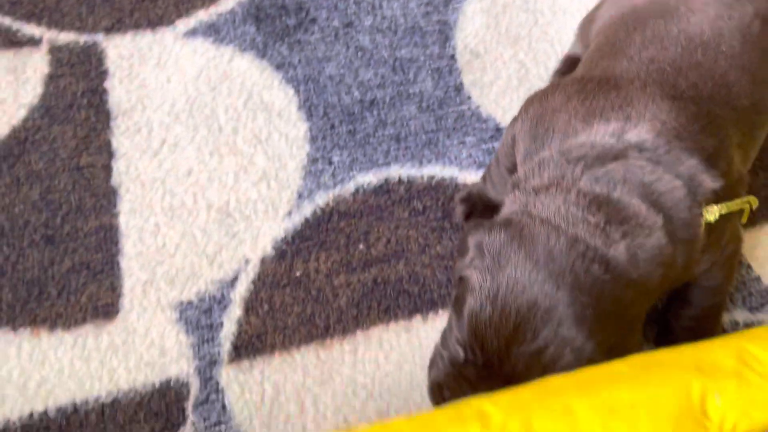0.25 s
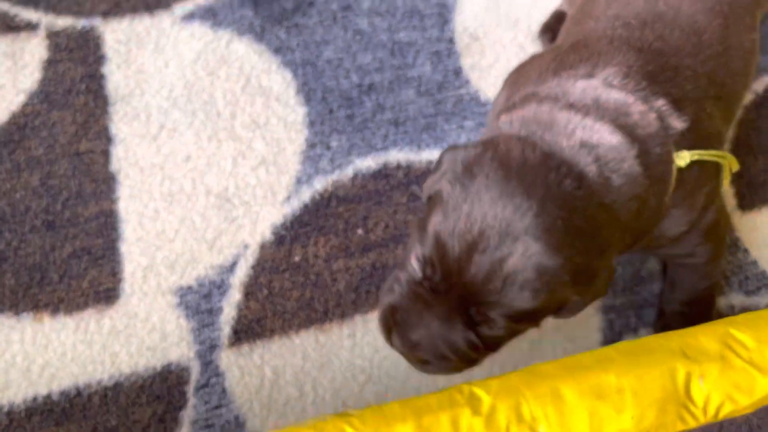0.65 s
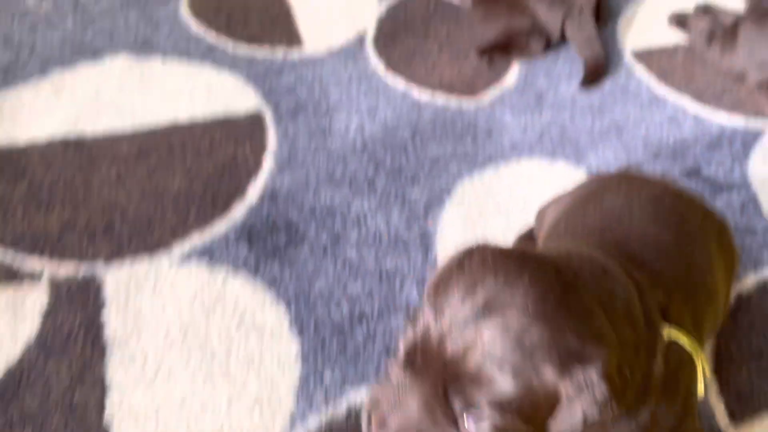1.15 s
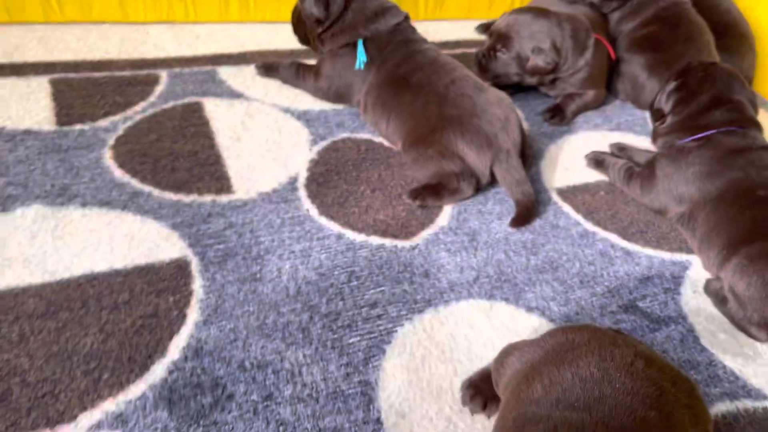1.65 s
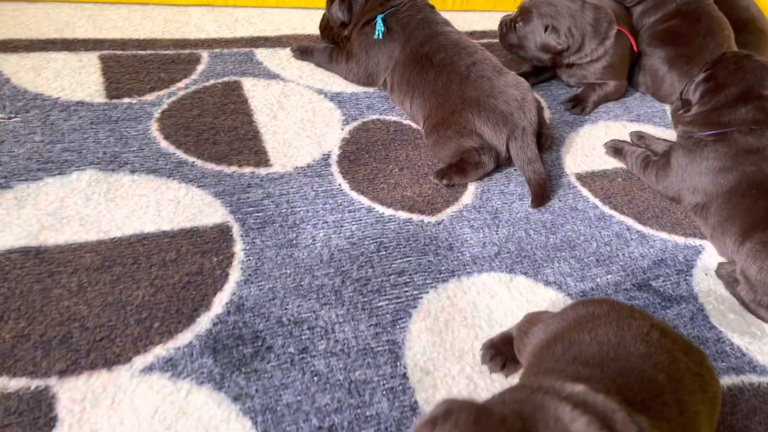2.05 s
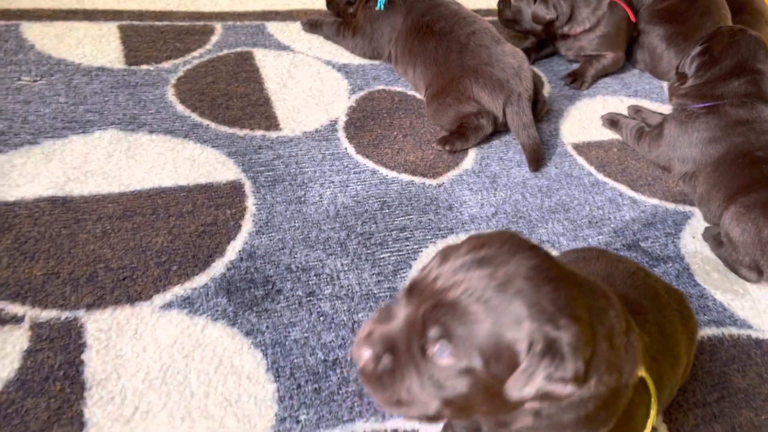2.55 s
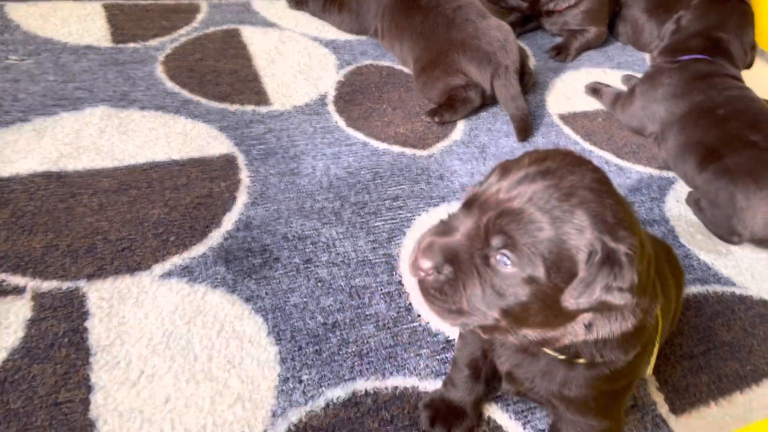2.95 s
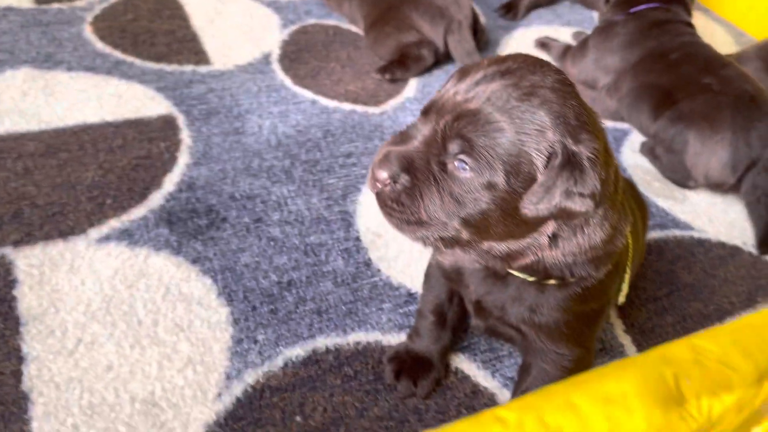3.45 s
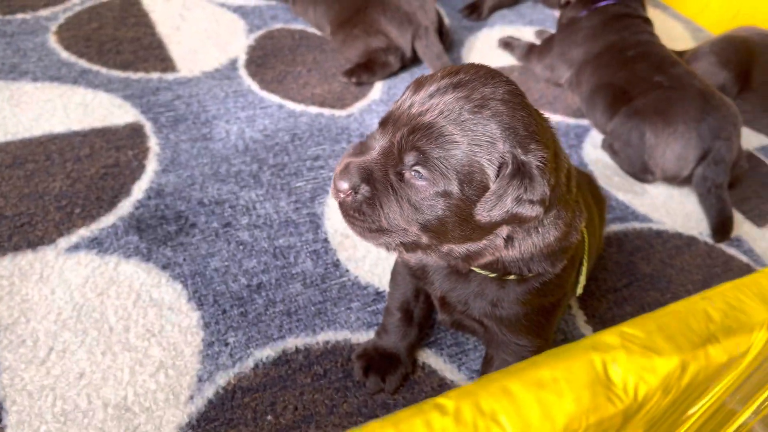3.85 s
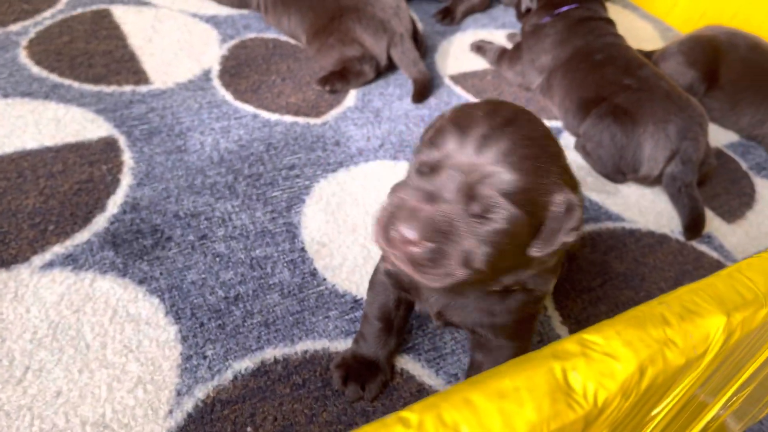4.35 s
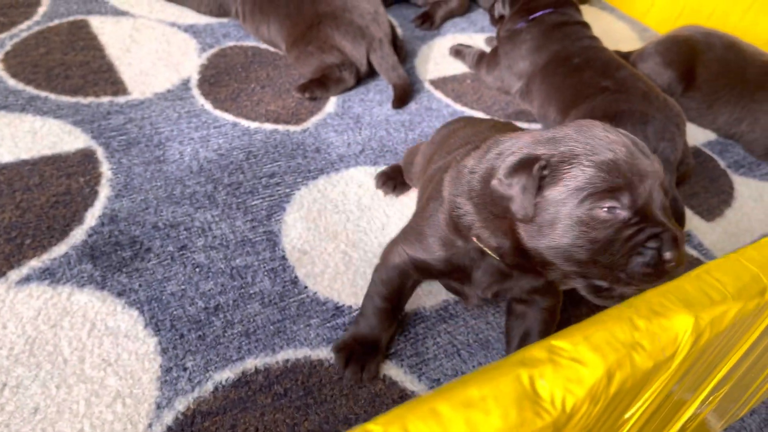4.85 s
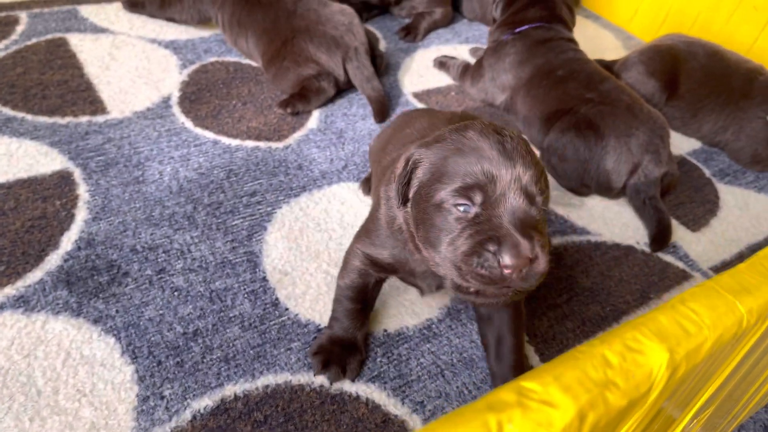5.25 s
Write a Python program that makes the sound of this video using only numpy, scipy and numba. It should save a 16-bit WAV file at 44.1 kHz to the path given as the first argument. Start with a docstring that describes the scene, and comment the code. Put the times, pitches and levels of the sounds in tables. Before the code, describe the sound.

Several very young puppies heard close by in a small soft room. Squeaks and muffled moans start at once with soft floor knocks, then a trembling whine slides down. Small grunts and carpet rustles lead into hoarse, creaky rasps. A sharp squeak and wavering whines follow, and the loudest piping yelps come near the end. Hand-held phone, faint room hush and low handling rumble.

```python
"""Puppies on a carpet indoors, heard by a hand-held phone close above: over shaped-noise hush and low
rumble, harmonic stacks squeak and moan at once, noise knocks the floor, trembling whines join at 0.2 s.
From 1.2 s short sliding grunts and noise brushes; from 1.9 s hoarse rasps: uneven slaps ring a throat.
Cries recur to the end, a yelp cluster at 4.5 s. Delay lines add a small soft room; two ports pick it up."""
import sys
import numpy as np
from scipy import signal
from scipy.fft import rfft, irfft, next_fast_len
from scipy.io import wavfile
from scipy.ndimage import uniform_filter1d
from numba import njit

SR = 44100
rng = np.random.default_rng(int(sys.argv[2]) if len(sys.argv) > 2 else 0)


def generate_wav(sig):
    """Save sig (samples, or channels by samples) to the path in sys.argv[1] as 16-bit PCM at SR."""
    pcm = np.round(np.clip(np.atleast_2d(sig).T, -1, 1) * 32767).astype(np.int16)
    wavfile.write(sys.argv[1], SR, pcm)


N = 242991

# colour of the room's quiet: f/Hz, relative density/dB
HUSH_COLOUR = [(53, -30), (90, -5), (341, -14.5), (987, -25), (2430, -37), (8830, -38.5), (10200, -52),
               (11100, -44.5), (12000, -45), (15600, -67.5), (22000, -120)]
HUSH_DB = -72.5
# low tremor of the hand that holds the phone: t/s, level/dB
RUMBLE_LEVEL = [(0.0, -77), (0.6, -80.5), (1.27, -70), (1.33, -81.5), (2.03, -63), (2.07, -77.5),
                (2.44, -59), (3.54, -66), (3.78, -85), (3.85, -65.5), (5.39, -83.5), (5.51, -65)]

# open-mouth gain: f/Hz, gain/dB
MOUTH_GAIN = [(2500, -9.5), (3100, -20.5), (4000, -23), (5000, -20.5), (6000, -13.5), (7500, -10.5),
              (9000, -8), (10000, -10.5), (11000, -6.5), (12500, -32)]
# yelps, squeaks, falling cries: (voice, curve)
# voice: 3rd harmonic re 2nd/dB, left minus right/dB, unsteadiness/0-1
# curve: t/s, pitch/Hz, fundamental/dB, 2nd harmonic/dB, treble overtones before mouth/dB
CRY_CURVES = [ ((-9.5, 0, 0.21), [(0.0, 1185, -40.5, -51, -31.5), (.028, 1287, -36.5, -62, -41),
              (.052, 1254, -26, -47, -41), (.062, 1369, -30.5, -62, -26)]), ((-26, 0, .25),
              [(.056, 1025, -35.5, -23.5, -28.5), (.061, 1058, -25, -21, -21), (.071, 1063, -32, -19, -15),
              (.08, 759.3, -31, -19.5, -19), (.095, 760.7, -29.5, -17, -17.5),
              (.115, 826, -37.5, -18.5, -26.5), (.135, 894, -45.5, -24, -24.5),
              (.141, 1025, -35.5, -13.5, -31), (.161, 1094, -41, -26.5, -29), (.168, 1035, -44, -17.5, -29),
              (.19, 1037, -52, -25.5, -41)]), ((-21.5, 3.5, 0.24), [(.705, 969.5, -54, -41, -48.5),
              (.747, 939, -49.5, -42.5, -43), (.795, 984, -51.5, -42.5, -40), (.843, 797.6, -29, -36, -41),
              (.919, 747, -37.5, -37.5, -44.5), (.947, 565.5, -31, -45.5, -41),
              (.975, 623, -44, -62, -52.5)]), ((0, 2, 0.088), [(2.755, 1052, -46, -60, -60),
              (2.771, 1056, -41, -37, -32.5), (2.8, 1000, -45.5, -20.5, -16.5),
              (2.811, 1060, -44.5, -20, -19), (2.818, 1427, -23, -19, -14),
              (2.845, 1471, -25.5, -21.5, -19), (2.867, 1541, -36.5, -34, -29.5)]), ((-9, 0, 0.28),
              [(3.5, 838, -56.5, -52.5, -53), (3.506, 785.3, -29.5, -41.5, -46.5),
              (3.534, 815, -24.5, -50, -48), (3.576, 668.3, -25.5, -44, -49),
              (3.628, 551.3, -32, -44.5, -44), (3.69, 414.4, -42, -31, -52.5)]), ((8.7, 3.8, 0.11),
              [(4.16, 1107, -40.5, -73.5, -42), (4.18, 1367, -40.5, -63.5, -40),
              (4.228, 1828, -35.5, -59.5, -38), (4.276, 1908, -31.5, -54, -25.5),
              (4.334, 1860, -34, -60.5, -31), (4.352, 1670, -35, -78, -53)]), ((-8.5, 1.5, 0.13),
              [(4.53, 1401, -35.5, -57, -51), (4.556, 1623, -23.5, -42.5, -41.5),
              (4.624, 1698, -21, -29.5, -34), (4.638, 1795, -32, -37, -24)]), ((0.23, 0, 0.18),
              [(4.633, 1809, -19, -18.5, -29), (4.643, 1823, -10.5, -24, -32.5),
              (4.685, 1899, -16.5, -33.5, -26.5), (4.739, 1753, -22, -46, -28.5),
              (4.768, 1176, -41, -58, -67)]), ((-0.024, 1.1667, 0.14), [(4.905, 1167, -45, -62, -65),
              (4.957, 1568, -22.5, -37.5, -33.5), (4.981, 1741, -14, -32.5, -25),
              (5.041, 1820, -14.5, -40.5, -29.5), (5.097, 1796, -23, -53, -32),
              (5.161, 1656, -25, -52, -36), (5.193, 1411, -31.5, -50, -47), (5.228, 819, -37.5, -62, -71)]),
              ((-3.5, 0.5, 0.09), [(5.385, 1134, -47, -50, -35), (5.409, 1276, -30, -45.5, -69),
              (5.439, 1529, -19.5, -49.5, -43), (5.461, 1630, -17, -49, -33.5),
              (5.51, 1731, -22, -44, -32.5)]), ]
# muffled moans, mouth shut: voice as for cries; curve: t/s, pitch/Hz, fundamental/dB, 2nd harmonic/dB
MOAN_CURVES = [ ((-18.5, -1, .2), [(.012, 958, -44.5, -60), (.028, 1017, -39.5, -51),
               (.048, 1133, -35.5, -51.5), (.058, 1140, -22, -41)]), ((-11.5, -3, 0.59),
               [(.08, 1136, -39.5, -30), (.11, 1094, -30.5, -35.5), (.134, 1009, -37, -37.5),
               (.164, 807, -22, -47), (.185, 964, -50.5, -48)]), ((-17, 2.5, .4),
               [(.42, 1186, -48.5, -43.5), (.458, 886, -31.5, -38.5), (.48, 841, -26.5, -33),
               (.512, 840.6, -21.5, -41), (.526, 848, -32, -47.5), (.62, 806, -64, -66.5)]),
               ((-19, 2.7, .24), [(.685, 800, -53, -55), (.695, 784, -31, -26.5), (.737, 623, -35.5, -33.5),
               (.769, 611, -40.5, -49.5), (.805, 453, -46.5, -39.5), (.893, 347, -36, -30.5),
               (.977, 271.4, -38.5, -43), (1.0, 286, -70.5, -62.5)]), ((2.5, 3, 0.24),
               [(2.865, 1570, -32, -43), (2.879, 1565, -25, -52.5), (2.943, 1590, -26.5, -52),
               (2.993, 1575, -30, -60), (3.05, 1554, -50.5, -67)]), ((-17, 2.8, 0.98),
               [(4.353, 1042, -61, -43.5), (4.363, 935, -55, -44.5), (4.381, 685, -41, -49),
               (4.401, 498, -49, -56.5), (4.43, 512, -59, -62)]), ]
MUFFLED_TREBLE_DB = -15  # moans and grunts, re 2nd harmonic
# long trembling whines: curve as for cries
# voice: as for cries, then shiver of pitch/%, shiver rate/Hz, time of a crest/s
WHINE_CURVES = [ ((2.2, 0.89, 0.079, 3, 22.5, .25), [(.183, 1296, -17, -31, -47),
                (.193, 1304, -36.5, -44.5, -27), (.25, 1335, -25.5, -44.5, -31.5),
                (.291, 1288, -29, -55, -28), (.331, 1240, -25, -51, -34.5), (.431, 1242, -24, -55, -32.5),
                (.446, 1179, -28, -67, -38)]), ((-11.5, 1, 0.43, 3, 19.5, .585),
                [(.44, 1210, -31.5, -50, -34), (.55, 1138, -35, -47, -40), (.614, 1097, -34, -44.5, -43),
                (.642, 1092, -37.5, -46.5, -43.5), (.695, 818, -47.5, -44, -44)]),
                ((-20, 1.5, 0.43, 1.6, 27, 2.5), [(2.863, 1544, -34, -50, -26),
                (2.899, 1627, -18, -42, -32.5), (2.925, 1529, -28.5, -41, -36),
                (3.001, 1369, -35, -42, -46), (3.069, 1428, -28.5, -42, -52),
                (3.103, 1470, -47, -52, -55)]), ((-19.5, 0, .5, 2.5, 21, 4),
                [(3.098, 1458, -29.5, -49, -54), (3.184, 1486, -40.5, -63.5, -57),
                (3.302, 1426, -32.5, -49.5, -59), (3.412, 1306, -38, -46.5, -50.5),
                (3.48, 1209, -38.5, -52, -49), (3.5, 910, -63.5, -44, -50)]),
                ((-5.5, 1, 0.35, 3.5, 20.5, 4), [(4.76, 600.6, -58, -65, -75),
                (4.81, 587.7, -44.5, -63.5, -60), (4.948, 582, -33.5, -42.5, -43),
                (5.014, 525.7, -37.5, -41, -70), (5.122, 583, -40, -39, -70), (5.21, 606.3, -42, -40, -48),
                (5.386, 593.4, -33.5, -34.5, -45), (5.418, 575, -35.5, -43, -40.5),
                (5.46, 469.3, -38, -36, -52), (5.51, 449, -31, -30, -70)]), ]

# soft floor knocks: t/s, f/Hz, level before envelope/dB, envelope time (twice the time to peak)/s
FLOOR_KNOCKS = [(0.069, 304.6, -37.5, 0.012), (.155, 302.5, -49.5, 0.023), (.34, 320, -50.5, 0.0046),
                (0.498, 1230, -40, 0.0067), (1.22, 1530, -44, 0.0077), (1.385, 2000, -60, 0.017),
                (3.828, 124.2, -38.5, 0.042), (3.843, 599, -42, 0.013), (4.575, 1280, -39, 0.017),
                (4.636, 2200, -22.5, 0.0021)]
# paws and fur on carpet: t/s, length/s, level before envelope/dB
CARPET_BRUSHES = [(1.203, 0.11, -65.5), (1.453, 0.086, -63.5), (1.724, 0.029, -71), (1.939, 0.14, -60)]

# short low grunts: t/s, length/s, first pitch/Hz, last pitch/Hz, fundamental/dB,
# 2nd harmonic re fundamental/dB, left minus right/dB
GRUNT_EVENTS = [(1.215, 0.03, 305, 320, -37, -4, 1.5), (1.378, 0.046, 366, 263.4, -44, -8, 1.5),
                (2.867, .04, 335, 336, -39, -14, 0), (3.241, 0.056, 760, 1005, -43.5, -20, 1.5),
                (3.455, .1, 430, 420, -42.5, 3, 0), (3.958, 0.049, 243, 277, -43, -4, 3),
                (4.323, 0.028, 310, 334, -37.5, -16.5, 0.5), (4.643, 0.065, 240, 260, -52.5, -6.5, -1.5),
                (4.71, 0.09, 310, 320, -52, 1.5, -0.5), (4.866, 0.14, 420, 231, -43, -5, 3)]
GRUNT_ATTACK_SHARE, GRUNT_RELEASE_SHARE = 0.2, 0.26  # of the length
GRUNT_EDGE_DB = -16.5  # both ends re hold
GRUNT_THIRD_DB, GRUNT_UNSTEADY = -12, 0.27  # 3rd harmonic re 2nd; unsteadiness 0-1

# hoarse rasps: t/s, length/s, level after attack/dB, level at crest/dB, level at end/dB,
# crest/share of length, nominal slap rate/Hz, settled sung pitch/Hz, sung power share/0-1, left minus right/dB
RASP_EVENTS = [(1.909, .1, -37, -30, -53, .62, 165, 785, 0.7, 1.5),
               (2.167, .155, -39.5, -27.5, -35.5, .62, 165, 777, .5, 0.5),
               (2.544, .345, -39, -32, -39, 0.28, 165, 743.4, 0.5, 1),
               (3.272, 0.28, -42.5, -41, -39, 1, 290, 827, 0.2, 3),
               (3.888, .485, -47, -44.5, -42.5, 0.18, 90, 756.5, .45, 3),
               (4.612, 0.21, -40, -42.5, -60, .3, 165, 724.5, 0.6, 3.5)]
# throat resonances: f/Hz, width of each of two passes/Hz, gain/dB
THROAT_BANDS = [(175, 140, -20), (307, 85, -7), (491, 130, -6.5), (789, 360, -2), (1300, 130, -13.5),
                (1459, 180, -11.5), (2190, 180, -37.5)]
# bands the nose lets through: low f/Hz, high f/Hz, gain/dB
NOSE_BANDS = [(5040, 6300, -10.5), (8230, 10640, 3)]
RASP_ATTACK_S, RASP_START_DB = 0.0079, -16.5  # start re level after attack
RASP_JITTER, RASP_SCATTER_DB = 0.3, 2  # spread of log slap interval; of slap level
RASP_ONSET_RISE, RASP_SETTLE_S = 0.25, 0.015  # sung pitch starts this share high, then settles
RASP_HISS_DB = -23.5  # re rasp level
RASP_LEAK_HZ = 125  # slap rate at which steady air equals the puffs

ROOM_T60_S, ROOM_DAMP, ROOM_DB = 0.41, 0.23, -15.5  # T60 before damping
ROOM_LOW_HZ = 428  # soft walls return little below this
# floor bounce, rows left and right: delay/ms, level/dB
FLOOR_BOUNCE = [(1.302, -28.5), (1.699, -22)]
# phase between ports: f/Hz, left lead/rad
PORT_LEAD = [(300, 0.5), (700, 1), (2000, 0.43), (3000, 1.5), (5000, 1.0), (6200, 0.93), (7600, 0.5),
             (8790, 2.35), (10900, -11), (12000, -1)]
TOP_HZ = 12000


def undb(db):
    """dB to amplitude ratio."""
    return 10 ** (np.asarray(db) / 20)


def unit(x):
    """Scales to RMS 1."""
    return x / np.sqrt(np.mean(x ** 2))


def band(x, hz, width_hz):
    """A resonance with gain 1 at its centre."""
    return signal.lfilter(*signal.iirpeak(hz, hz / width_hz, SR), x)


def flutter(size, rate_hz):
    """Smooth chance that changes about rate_hz times a second, RMS 1."""
    k = max(int(SR / rate_hz), 1)
    noise = rng.standard_normal(size)
    return unit(uniform_filter1d(uniform_filter1d(noise, k), k))


def spread(table):
    """First sample, times and columns of a curve table, and a gate with 5 ms edges."""
    rows = np.array(table, float)
    t = np.arange(int(max(rows[0, 0], 0) * SR), min(int(rows[-1, 0] * SR), N)) / SR
    gate = np.clip(np.minimum(t - t[0], t[-1] - t) / 0.005, 0, 1)
    columns = [np.interp(t, rows[:, 0], c) for c in rows[:, 1:].T]
    return round(t[0] * SR), t, columns, gate


def add(out, start, x, pan_db):
    """Places a sound between left and right by level difference."""
    stop = min(start + len(x), N)
    gains = undb(np.array([[0.5], [-0.5]]) * pan_db)
    out[:, start:stop] += (x * gains)[:, :stop - start]


def hush():
    """Coloured noise, wider in the treble, over a wandering rumble nearly alike at both ports."""
    f = np.maximum(np.fft.rfftfreq(N, 1 / SR), 1)
    table_hz, table_db = np.transpose(HUSH_COLOUR)
    colour = undb(np.interp(np.log(f), np.log(table_hz), table_db)) * (f > 90)
    mid = irfft(rfft(rng.standard_normal(N)) * colour, N)
    side = irfft(rfft(rng.standard_normal(N)) * colour * np.clip(f / 2000, 0.2, 1), N)
    stereo = mid + side * np.array([[1], [-1]])
    air = stereo / np.std(mid) * undb(HUSH_DB + 0.54 * flutter(N, 8))
    low = rng.standard_normal(N) + 0.2 * rng.standard_normal((2, N))
    for _ in range(3):
        low = band(low, 57, 34)
    return air + unit(low) * undb(np.interp(np.arange(N) / SR, *np.transpose(RUMBLE_LEVEL)))


def mouth(hz):
    """Gain of the open mouth over frequency."""
    table_hz, table_db = np.transpose(MOUTH_GAIN)
    return undb(np.interp(np.log(hz), np.log(table_hz), table_db, left=-60, right=-90))


def cry(t, hz, first_db, second_db, third_db, treble_db, unsteady, shiver_pct=0, shiver_hz=1, crest_s=0):
    """Vocal folds sing a harmonic stack; the shivering body shakes pitch and level, breath leaks past."""
    shake = np.cos(2 * np.pi * shiver_hz * (t - crest_s)) * (1 + 0.25 * flutter(len(t), 12))
    hz = uniform_filter1d(hz, size=220, mode="nearest")  # folds cannot turn a sharp corner
    hz = hz * (1 + shiver_pct / 100 * shake + 0.022 * unsteady * flutter(len(t), 300))
    phase = 2 * np.pi * np.cumsum(hz) / SR
    voice = np.zeros(len(t))
    for k, db in enumerate((first_db, second_db, third_db), 1):
        voice += undb(db) * np.sin(k * phase + k)
    lips_hz = 2000 * np.clip((hz / 800) ** 3, 1, 3)  # high cries part the lips, low ones stay muffled
    for k in range(4, 27):
        # overtones fade from the third; the mouth lifts them again, each coming and going
        fade = undb(third_db - 14 * (k - 3)) / (1 + (k * hz / lips_hz) ** 8)
        lift = undb(treble_db + 5 * flutter(len(t), 30)) * mouth(k * hz) * np.sqrt(hz / 3000)
        voice += (fade + lift) * np.sin(k * phase + 0.39 * k * k)
    f = np.fft.rfftfreq(len(t), 1 / SR) + 1
    breath_gain = mouth(f) / (1 + (4200 / f) ** 4)
    air = irfft(rfft(rng.standard_normal(len(t))) * breath_gain, len(t))
    breath = unit(air) * undb(treble_db - 15 + 14 * min(unsteady, 0.6))
    tremble = 1 + 0.033 * shiver_pct * shake + unsteady * flutter(len(t), 150)
    return np.sqrt(2) * voice * tremble + breath


def knocks(out):
    """Dull floor knocks: noise through a doubled resonance, quick swell and decay."""
    for s, hz, db, envelope_s in FLOOR_KNOCKS:
        t = np.arange(int(3 * envelope_s * SR)) / SR
        noise = rng.standard_normal(len(t))
        ring = unit(band(band(noise, hz, hz / 3), hz, hz / 3))
        envelope = t / envelope_s * np.exp(1 - 2 * t / envelope_s)
        add(out, int(s * SR), undb(db) * ring * envelope, 1.5)


def brushes(out):
    """Paws and fur rub the carpet: short uneven humps of broad noise."""
    for s, length_s, db in CARPET_BRUSHES:
        size = int(length_s * SR)
        hump = np.sin(np.pi * np.linspace(0, 1, size) ** 0.6) * (1 + 0.3 * flutter(size, 300))
        noise = rng.standard_normal(size)
        rub = unit(band(noise, 800, 1100) + 1.5 * noise)
        add(out, int(s * SR), hump * undb(db) * rub, 1.5)


def grunt(s, length_s, first_hz, last_hz, db, second_db):
    """Curve of a grunt: quick swell, hold, fade, the pitch sliding evenly."""
    share = np.array([0, min(GRUNT_ATTACK_SHARE, 0.45), 1 - min(GRUNT_RELEASE_SHARE, 0.45), 1])
    level_db = db + GRUNT_EDGE_DB * np.array([1, 0, 0, 1])
    pitch_hz = first_hz + (last_hz - first_hz) * share
    return np.c_[s + length_s * share, pitch_hz, level_db, level_db + second_db]


def rasp(t, level_db, rate_hz, sung_hz, sung):
    """Folds slap shut unevenly and ring the throat; part sings near its main resonance; slaps let air hiss."""
    chance = rng.standard_normal((len(t) // 100, 2))
    at = np.cumsum(SR / rate_hz * np.exp(RASP_JITTER * chance[:, 0])).astype(int)
    inside = at < len(t)
    slaps = np.zeros(len(t))
    slaps[at[inside]] = undb(RASP_SCATTER_DB * chance[inside, 1])
    puff = unit(signal.lfilter([1], [1, -0.985], slaps))

    drive = unit(slaps) + (0.93 + 0.31 * puff) * rng.standard_normal(len(t))
    throat = np.zeros(len(t))
    for k, (hz, width_hz, db) in enumerate(THROAT_BANDS):
        throat += (-1) ** k * undb(db) * band(band(drive, hz, width_hz), hz, width_hz)
    throat *= 1 + 0.22 * flutter(len(t), 25)
    shut_mouth = signal.butter(8, 2250, fs=SR, output="sos")  # passes no treble
    throat = signal.sosfilt(shut_mouth, throat)

    settle = RASP_ONSET_RISE * np.exp(-(t - t[0]) / RASP_SETTLE_S)
    pitch_hz = sung_hz * (1 + settle + 0.04 * flutter(len(t), 40))
    tone = np.sqrt(2) * np.sin(2 * np.pi * np.cumsum(pitch_hz) / SR)
    tone *= 1 + 0.33 * flutter(len(t), 200)

    leak = (rate_hz / RASP_LEAK_HZ) ** 2  # the faster the slaps, the less the folds seal between them
    air = rng.standard_normal(len(t)) * (leak + puff)
    hiss = np.zeros(len(t))
    for low_hz, high_hz, db in NOSE_BANDS:
        nose = signal.butter(3, [low_hz, high_hz], "band", fs=SR, output="sos")
        hiss += undb(db) * signal.sosfilt(nose, air)
    opening = 1 - np.exp(-(t - t[0]) / 0.018)  # the air takes a moment to flow

    sung = np.clip(sung, 0, 1)
    body = np.sqrt(1 - sung) * unit(throat) + np.sqrt(sung) * tone
    return undb(level_db) * (body + opening * undb(RASP_HISS_DB) * unit(hiss))


@njit
def walls(x, lags, gain, damp):
    """Eight delay lines that feed each other, duller on every round."""
    line, soft, out = np.zeros((8, 4096)), np.zeros(8), np.zeros((2, len(x)))
    for i in range(len(x)):
        total = 0.
        for k in range(8):
            soft[k] += (1 - damp) * (gain[k] * line[k, (i - lags[k]) & 4095] - soft[k])
            total += soft[k]
            out[k % 2, i] += soft[k]
        for k in range(8):
            line[k, i & 4095] = x[i] + soft[k] - total / 4
    return out


def room(dry):
    """Soft room: the mono sum, thinned in the bass, rings in the delay lines."""
    lags = np.array([541, 683, 829, 1031, 1237, 1493, 1777, 2083])  # samples
    high_pass = signal.butter(1, ROOM_LOW_HZ, "high", fs=SR)
    sent = signal.lfilter(*high_pass, dry.mean(axis=0)) + 1e-18  # offset avoids denormals
    return undb(ROOM_DB) * walls(sent, lags, undb(-60 * lags / SR / ROOM_T60_S), ROOM_DAMP)


def voices(out):
    """Cries, moans, whines and grunts, all sung by the same folds."""
    muffled = list(MOAN_CURVES)
    for *event, pan_db in GRUNT_EVENTS:
        muffled.append(((GRUNT_THIRD_DB, pan_db, GRUNT_UNSTEADY), grunt(*event)))
    calls = list(CRY_CURVES) + list(WHINE_CURVES)
    for voice, table in muffled:
        treble_db = np.array(table)[:, 3] + MUFFLED_TREBLE_DB
        calls.append((voice, np.c_[table, treble_db]))
    for (third_db, pan_db, *voice), table in calls:
        start, t, (hz, first_db, second_db, treble_db), gate = spread(table)
        sound = cry(t, hz, first_db, second_db, second_db + third_db, treble_db, *voice)
        add(out, start, gate * sound, pan_db)


def rasps(out):
    """Each rasp follows attack, crest and end levels, linear in dB."""
    for s, length_s, early_db, crest_db, end_db, crest, rate_hz, sung_hz, sung, pan_db in RASP_EVENTS:
        curve = [(s, early_db + RASP_START_DB), (s + RASP_ATTACK_S, early_db),
                 (s + crest * length_s, crest_db), (s + length_s, end_db)]
        start, t, (level_db,), gate = spread(curve)
        add(out, start, gate * rasp(t, level_db, rate_hz, sung_hz, sung), pan_db)


def scene():
    """Direct sounds, their room and the hush."""
    direct = np.zeros((2, N))
    voices(direct)
    knocks(direct)
    brushes(direct)
    rasps(direct)
    return direct + room(direct) + hush()


def record(dry):
    """Each port hears its own floor bounce and turns the phase its own way; the phone cuts the top."""
    size = next_fast_len(N + 512)
    f = np.fft.rfftfreq(size, 1 / SR)
    bounce = np.array([1 + undb(db) * np.exp(-2j * np.pi * f * ms / 1000) for ms, db in FLOOR_BOUNCE])
    treble = undb(-8 / (1 + (9700 / (f + 1)) ** 40))  # steep 8 dB treble shelf near 9.7 kHz
    lead_rad = np.interp(f, *np.transpose(PORT_LEAD), left=0)
    turn = np.exp(0.5j * np.array([lead_rad, -lead_rad]))
    heard = irfft(rfft(dry, size) * bounce * treble * turn, size)[:, :N]
    top_cut = signal.ellip(10, 0.2, 50, TOP_HZ, fs=SR, output="sos")
    return signal.sosfilt(top_cut, heard)


dry = scene()
out = record(dry)
generate_wav(out)
```